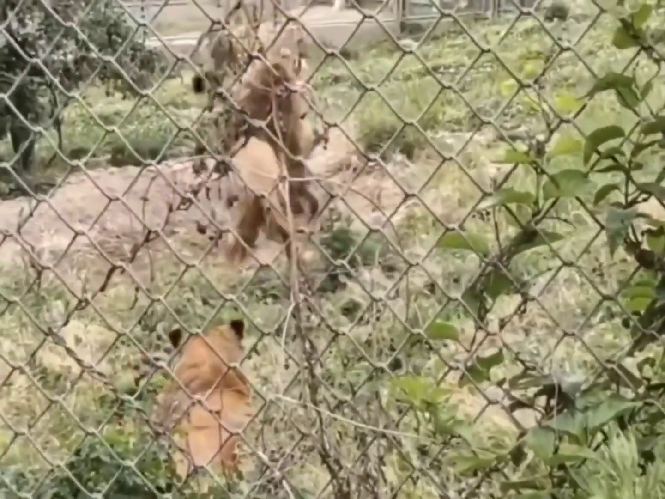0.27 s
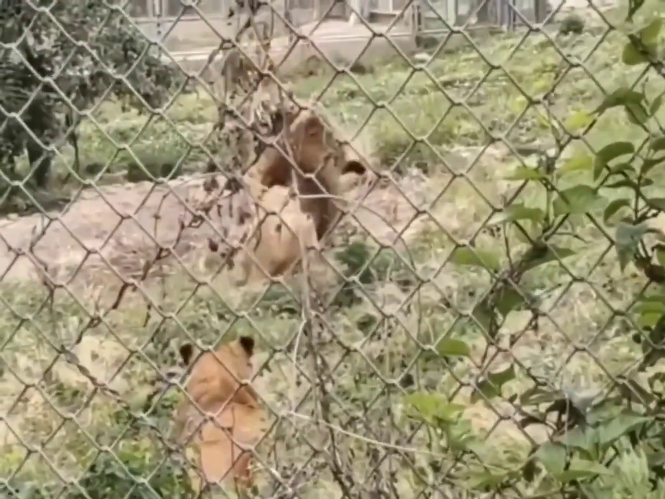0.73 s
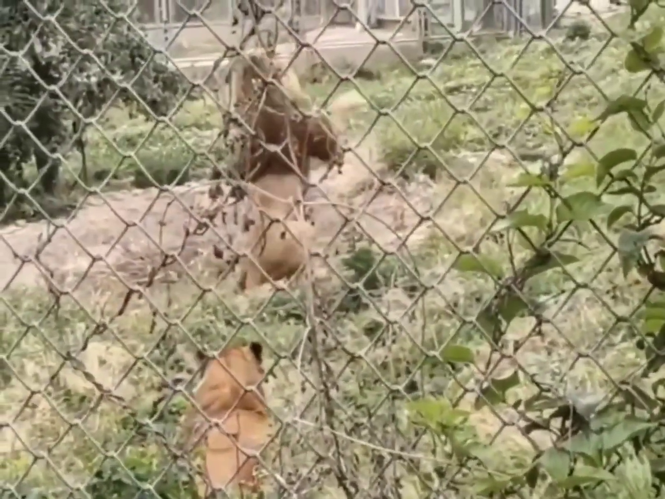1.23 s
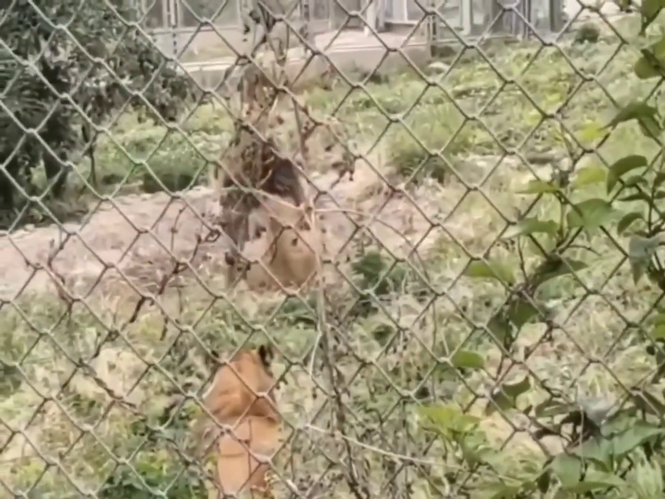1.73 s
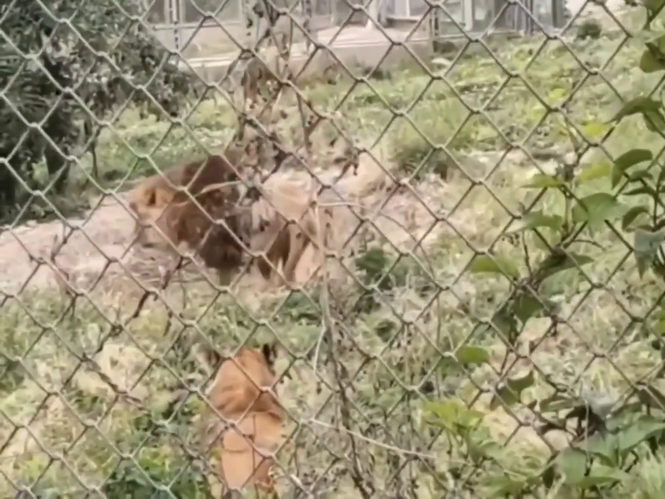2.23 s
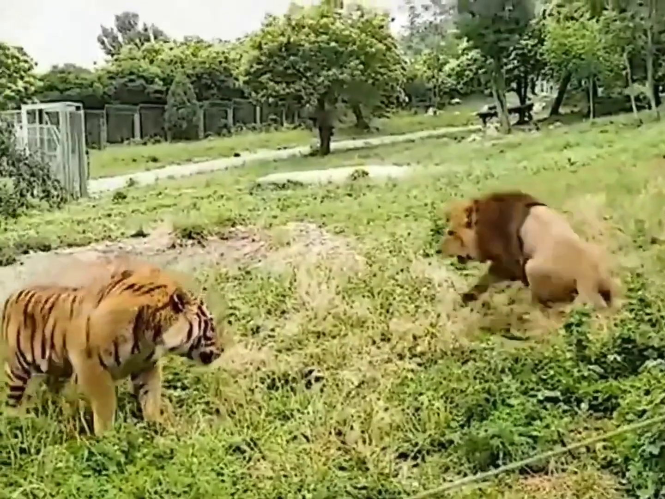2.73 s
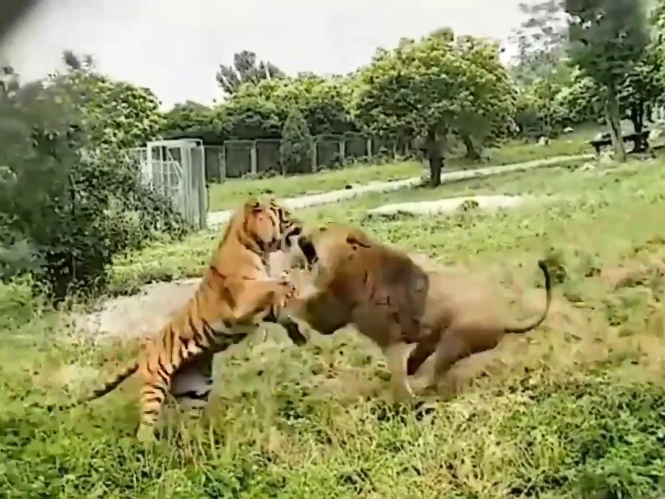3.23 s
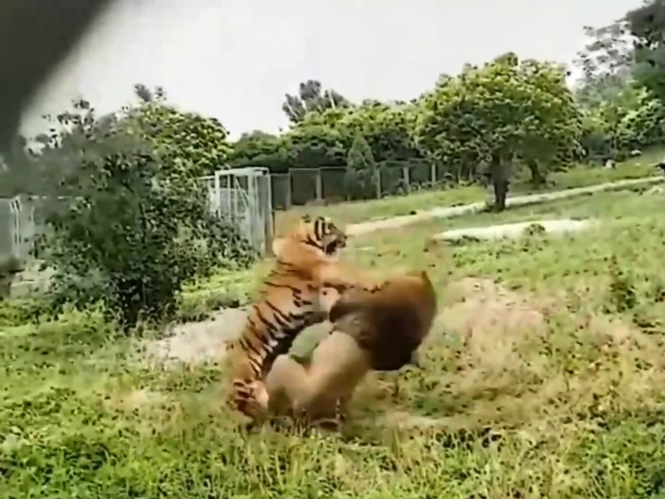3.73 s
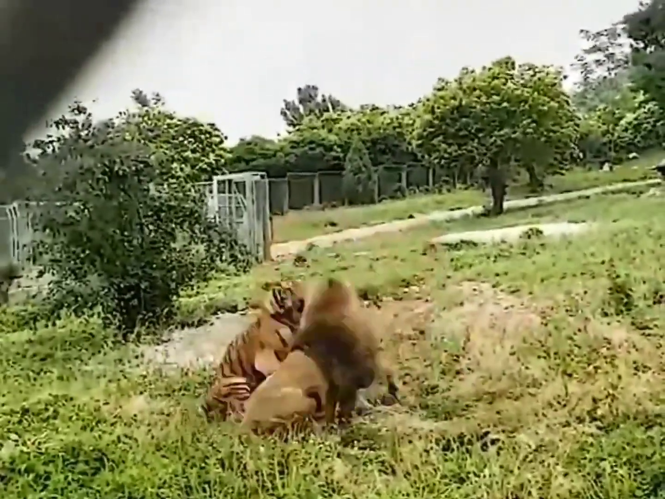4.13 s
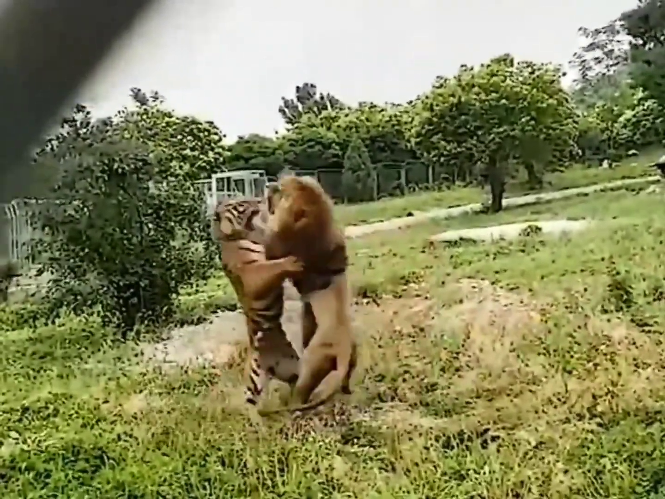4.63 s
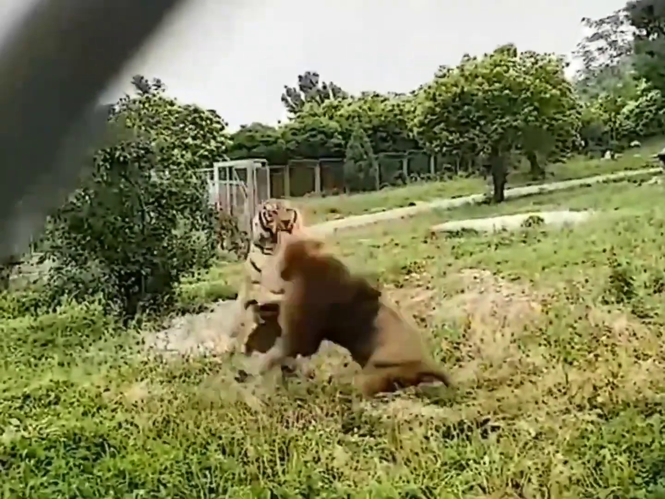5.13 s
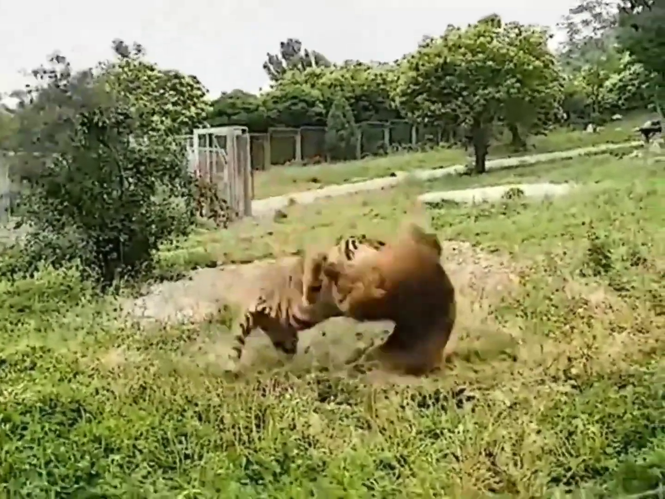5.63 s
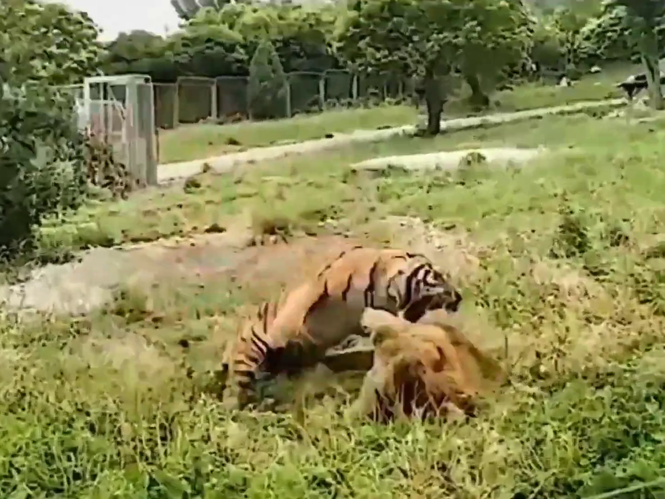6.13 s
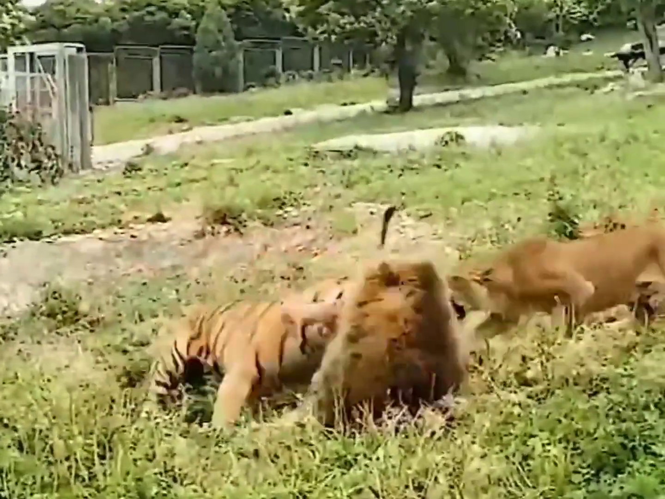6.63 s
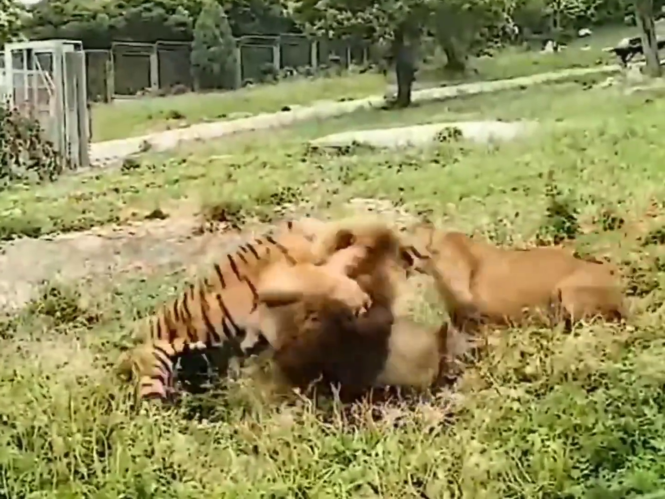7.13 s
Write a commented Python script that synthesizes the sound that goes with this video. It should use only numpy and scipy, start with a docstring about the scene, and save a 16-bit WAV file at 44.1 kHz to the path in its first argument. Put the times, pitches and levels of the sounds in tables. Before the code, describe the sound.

Big cats fight in the open air: rattling low growls swell into hoarse, raspy roars and snarls, with heavy bodies thudding on the ground.

```python
"""A grassy enclosure where lions and a tiger fight: rattling growls break into hoarse roars and snarls.
Slack vocal folds flap unevenly and ring chest, throat and mouth; some roars lock into a pitch.
The puffs of air between the flaps rasp and sizzle at the teeth, and slow single flaps stand out as rattles.
Bodies thud on the ground, dry stalks snap, paws crunch into brush and a short thin squeal slips out.
Coloured noise is the open air behind it all; the whole level dips briefly twice."""
import sys
import numpy as np
from scipy import signal
from scipy.fft import rfft, irfft
from scipy.io import wavfile
from scipy.ndimage import uniform_filter1d

SR = 44100
rng = np.random.default_rng(int(sys.argv[2]) if len(sys.argv) > 2 else 0)


def bounce(signal):
    """Save signal as a 16-bit WAV file at the path given by the first command-line argument."""
    frames = np.transpose(np.atleast_2d(signal))
    limited = np.clip(frames, -1, 1)
    pcm = np.round(limited * 32767).astype(np.int16)
    wavfile.write(sys.argv[1], SR, pcm)


N = 325017
T = np.arange(N) / SR


def amp(db):
    """Turns decibels into an amplitude factor."""
    return 10 ** (np.asarray(db) / 20)


def curves(rows):
    """Draws each column of a timed table as a curve over all samples."""
    s, *columns = np.transpose(rows)
    return [np.interp(T, s, c) for c in columns]


def steady(x, size=2200):
    """Levels out a sound so that its short-term power stays near one."""
    power = uniform_filter1d(uniform_filter1d(x ** 2, size), size // 2)
    return x / np.sqrt(abs(power) + 1e-14)


def wander(hz):
    """Slow random drift of unit size that fades out above the given rate."""
    freqs = np.fft.rfftfreq(N, 1 / SR)
    x = irfft(rfft(rng.standard_normal(N)) / (1 + (freqs / hz) ** 4), N)
    return x / x.std()


def colour(x, points):
    """Shapes a sound by a spectrum of (f/Hz, level/dB) points; unit power."""
    hz, db = np.transpose(points)
    log_freqs = np.log(np.fft.rfftfreq(N, 1 / SR) + 1)
    y = irfft(rfft(x) * amp(np.interp(log_freqs, np.log(hz), db)), N)
    return y / y.std()


def resonate(x, hz, pole_width):
    """A steep resonance, three equal poles deep, that follows the curve hz; near unit power."""
    turn = np.exp(2j * np.pi * np.cumsum(hz * np.ones(N)) / SR)
    r = np.exp(-np.pi * pole_width / SR)
    # shift the resonance down to 0 Hz, smooth there, shift back up
    y = (turn * signal.lfilter([(1 - r) ** 3], np.poly([r, r, r]), x / turn)).real
    return steady(y)


def add(mix, s, sound):
    """Lays a sound into the mix at s seconds."""
    part = mix[max(round(s * SR), 0):][:len(sound)]
    part += sound[:len(part)]


def echoes(x, wet_db, t60):
    """Scattered echoes: random taps of either sign after 3 ms, dying by 60 dB in t60 seconds."""
    t = np.arange(SR // 2) / SR
    signs = rng.choice([-1., 1.], len(t))
    hits = rng.random(len(t)) < 2500 / SR  # 2500 echoes per s on average
    taps = signs * hits * (t > .003) * amp(-60 * t / t60)
    wet = amp(wet_db) * signal.fftconvolve(x, taps / np.linalg.norm(taps))[:N]
    return (x + wet) / np.hypot(1, amp(wet_db))


def open_air():
    """The bed of the place: steady noise, heaviest in the bass."""
    # spectrum of the open air: f/Hz, level/dB
    air_spectrum = [(20, -49), (50, 12), (100, 23), (250, 14.5), (900, 3), (2000, -13.5), (4000, -18.5),
                    (6000, -32), (15000, -30)]
    return amp(-46.5) * colour(rng.standard_normal(N), air_spectrum)


def impacts(rows, spectrum, t60, gain_db):
    """Short bursts of coloured noise with a fast onset and an exponential decay."""
    envelope, t = np.zeros(N), np.arange(6000) / SR
    for s, level_db in rows:
        onset = 1 - np.exp(-40 * t / t60)
        add(envelope, s, amp(level_db + gain_db - 60 * t / t60) * onset)
    return envelope * colour(rng.standard_normal(N), spectrum)


def body_thuds():
    """Bodies hit the ground: noise bursts weighted to the low end."""
    # blows, before the gain: t/s, level/dB
    blows = [(2.212, -30.5), (2.292, -26), (2.315, -27), (3.722, -31), (3.997, -30.5), (5.666, -39)]
    spectrum = [(20, -46), (70, 8), (170, 19.0), (450, 2), (1500, -12.5), (4000, -28), (8000, -64)]
    return impacts(blows, spectrum, t60=0.072, gain_db=6.5)


def stalk_snaps():
    """Dry stalks snap: very short bright noise bursts."""
    # snaps, before the gain: t/s, level/dB
    breaks = [(0.195, -52), (4.9222, -41), (5.907, -47), (7.2405, -44.5), (7.3297, -43)]
    spectrum = [(800, -25), (3000, 6), (9500, 4.0), (15000, 9.0)]
    return impacts(breaks, spectrum, t60=0.013, gain_db=13.5)


def brush_crunches():
    """Paws crunch into dry brush: short noise bursts strongest around 900 Hz."""
    # steps, before the gain: t/s, level/dB
    steps = [(7.312, -39), (7.341, -36), (7.355, -35.5)]
    spectrum = [(100, -22), (900, 13.5), (2000, 2.5), (4200, 0.5), (7000, -13.0), (10000, -3.0),
                (15000, -26)]
    return impacts(steps, spectrum, t60=0.028, gain_db=9)


def squeal():
    """Air squeezed through a tight gap: narrow resonances swell and fade while their pitch falls."""
    # resonances of the gap: f/Hz, pole width/Hz, level/dB
    gap_modes = [(2570, 614, -44.5), (6110, 1230, -51)]
    start_s, length_s, fall_share = 7.248, 0.054, 0.18
    progress = np.clip((T - start_s) / length_s, 0, 1)
    air = rng.standard_normal(N)
    fall = 1 - fall_share * (progress - .5)
    tone = sum(amp(db) * resonate(air, hz * fall, width) for hz, width, db in gap_modes)
    return np.sin(np.pi * progress) * tone


def rattle_flaps():
    """Spells out each rattling run as nearly even slow flaps: (t/s, level/dB)."""
    # runs of flaps: first flap/s, last flap/s, level/dB
    runs = [(0.109, 0.33, -25.5), (0.384, 0.564, -25), (1.557, 1.673, -39), (1.971, 2.053, -44.5),
            (2.566, 2.64, -27)]
    flaps_per_s, jitter_s, uneven_db = 39, 0.00034, 1.2
    flaps = []
    for first, last, level_db in runs:
        times = np.linspace(first, last, round((last - first) * flaps_per_s) + 1)
        late, strong = rng.standard_normal((len(times), 2)).T
        flaps += zip(times + jitter_s * late, level_db + uneven_db * strong)
    return flaps


def single_flaps(rows, modes, scatter, rebound, grit, gain_db=8, rise_s=.001):
    """Each slow flap (s, dB, dB per octave, tuning ratio) rings the tract, rough with grit, and rebounds once."""
    out, t = np.zeros(N), np.arange(4000) / SR
    hz, db, t60 = np.transpose(modes)[:, :, None]
    for s, level_db, tilt_db, tuning in rows:
        detune, colour_db = rng.standard_normal((2, *hz.shape))
        mode_db = db + tilt_db * np.log2(hz / hz[0]) + 2 * colour_db
        swing = np.sin(2 * np.pi * hz * tuning * (1 + scatter * detune) * t)
        rings = amp(mode_db - 60 * t / t60) * swing
        flutter = signal.lfilter([.03], np.poly([.94, .94]), rng.standard_normal(rings.shape))
        flap = (rings * (1 + grit * flutter)).sum(0) * (1 - np.exp(-(t / rise_s) ** 2))
        rebound_s = rng.uniform(.002, .006)
        flap = flap + rebound * np.interp(t - rebound_s, t, flap)
        add(out, s, amp(level_db + gain_db) * flap / abs(flap).max())
    return out


def growl_flaps(flaps):
    """Slow flaps of a growl ring the tract with the mouth half open."""
    # modes of the half-open tract: f/Hz, level/dB, t60/s
    half_open_modes = [(247, -0.5, 0.03), (336, -5, 0.062), (485, 5.5, 0.05), (701, -2.5, 0.052),
                       (840, -9, 0.026)]
    rows = [(s, db, 0, 1) for s, db in flaps]
    return single_flaps(rows, half_open_modes, scatter=.045, rebound=.2, grit=.08)


def snarl_flaps(flaps):
    """Slow flaps with bared teeth: brighter, grittier, and tuned flap by flap."""
    # modes of the tract with bared teeth: f/Hz, level/dB, t60/s
    bared_modes = [(273, 3.5, 0.03), (516, 4, 0.047), (916, 4.5, 0.047), (1633, -5, 0.018),
                   (1867, -2.5, 0.019), (2423, -9, 0.021)]
    listed_mouth_hz = 910  # mouth resonance at which the modes lie as listed
    rows = [(s, db, tilt_db, hz / listed_mouth_hz) for s, db, tilt_db, hz in flaps]
    return single_flaps(rows, bared_modes, scatter=.025, rebound=.55, grit=.3)


def flap_pause(flaps, length_s=0.0225, depth_db=-9):
    """The folds rest around each slow flap: a short dip of the voice."""
    near = np.zeros(N)
    for s, *_ in flaps:
        near[abs(T - s) < length_s / 2] = 1
    return amp(depth_db * uniform_filter1d(near, 200))


def folds(rate_hz, jitter, uneven_db, puff_length):
    """Uneven flaps of the folds, and the decaying puff of air that each lets through."""
    turns = np.cumsum(rate_hz * np.exp(jitter * wander(69.58))) / SR
    cycle = turns.astype(int)
    strength = amp(uneven_db * np.clip(rng.standard_normal(N), -2, 2))[cycle]
    flaps = np.diff(cycle, prepend=0) * strength
    puffs = strength * np.exp(-(turns % 1) / puff_length)
    return flaps, puffs


def locked_roar(rows, flutter=0.026, shimmer=0.3, blend_s=0.029):
    """Folds swinging regularly: wavering tone, buzz of overtones, clean share, and pull on the throat's pitch."""
    hz, clean = curves(rows)
    pull = np.clip(np.minimum(T - rows[0][0], rows[-1][0] - T) / blend_s + 1, 0, 1)
    clean = np.clip(clean, 0, .97) * pull
    turns = np.cumsum(hz * (1 + flutter * wander(59.2))) / SR
    tone = np.sqrt(2 * clean) * np.cos(2 * np.pi * turns) * (1 + shimmer * wander(47))
    buzz = np.sqrt(clean * SR / hz) * np.diff(turns.astype(int), prepend=0)
    return tone, buzz, clean, pull, pull * hz


def cries():
    """Each cry rises, changes slowly and is released; gives four levels in dB and the mouth's shape over time."""
    # bursts of growl or roar: start/s, length/s, rise/s, change over the length/dB,
    # chest/dB, throat/dB, mouth/dB, rasp at the teeth/dB (all before later trims),
    # jaw f/Hz, lip f/Hz, lip level/dB, bright overtone level/dB, glide of the mouth/octaves
    bursts = [(0.022, 0.68, 0.055, -9, -36.5, -31.5, -27, -52, 490, 708, -1, -15.5, -0.12),
              (0.598, 0.14, 0.093, 1, -52, -28.5, -28.5, -40.5, 505, 635, 14, -4, 0.081),
              (0.678, 0.35, 0.12, -4.5, -48.5, -22, -19, -30.5, 561, 703, 2.5, -7, 0.034),
              (1.001, 0.47, 0.085, -8, -42, -21.5, -23.5, -41, 507, 739, 1.5, -10.5, 0.086),
              (1.429, 0.36, 0.024, -5, -37, -41.5, -36.5, -59.5, 432.5, 750, -22, -7.5, -0.095),
              (1.867, 0.15, 0.14, 0, -44.5, -36, -44.5, -71, 421, 653, -22, -18, -0.036),
              (2.188, 0.21, 0.022, 3, -42.5, -46, -48.5, -60, 450.5, 837.6, -5.5, -9, 0.17),
              (2.44, 0.18, 0.091, -4, -35.5, -36, -30, -46.5, 483.7, 843.4, -5.5, -10.5, 0.15),
              (2.721, 0.19, 0.036, -5, -42, -45.5, -42, -54.5, 467.4, 827, -7.5, -12.5, -0.062),
              (3.093, 0.14, 0.1, 4, -53, -29.5, -35, -45, 566, 895, -1, -6.5, -.12),
              (3.227, 0.27, 0.047, -0.5, -46.5, -19, -28, -41.5, 535.5, 806.5, 1, -6, -0.15),
              (3.499, 0.29, 0.045, -5, -43, -25, -30, -43, 526, 776, 1, -6, 0.13),
              (3.889, 0.3, 0.08, -4, -44, -52.5, -50.5, -56, 486, 880, -5.5, -4.5, 0.013),
              (4.15, 0.2, 0.12, -4, -40.5, -37.5, -33.5, -53, 520, 916.6, -8, -15, 0.092),
              (4.552, 0.15, 0.064, -1, -50, -43.5, -34, -54, 530.5, 923, -12, -11.5, 0.15),
              (4.659, 0.22, 0.13, 0, -56, -31, -34.5, -48, 534.3, 800.3, -4, -10.5, -0.14),
              (4.883, 0.44, 0.05, -5, -43, -32, -29.5, -47, 525, 822.3, -4.5, -11, -0.088),
              (5.388, 0.13, 0.12, -1, -37.5, -47.5, -37, -48.5, 515.2, 917, -3, -19, -0.023),
              (5.601, 0.36, 0.088, -4, -45.5, -44.5, -42, -48.5, 500, 942.7, -7.5, -13.5, 0.08),
              (5.956, 0.2, 0.018, -2, -48, -45, -35.5, -51, 486.4, 950, -10, -12, 0.027),
              (6.151, 0.17, 0.051, -12, -42, -23.5, -19, -42, 516, 744.6, -12, -16, -0.025),
              (6.301, 0.21, 0.099, -7, -41.5, -21, -22, -43, 520, 740, -8.5, -17, 0.23),
              (6.5, 0.25, 0.039, -15, -34.5, -25, -33.5, -50, 504, 860, -4, -7, -0.1),
              (6.717, 0.22, 0.11, -4, -37, -33, -31.5, -45, 469.5, 879.6, -5.5, -11.5, 0.22),
              (6.994, 0.21, 0.12, 1, -41, -41, -37.5, -49, 476, 1031, -5.5, -8, 0.28),
              (7.316, 0.053, 0.029, 3.5, -42, -39.5, -39, -45, 467, 907, 7, -4, 0.046)]
    # chest, throat, mouth, rasp [dB per s]
    release = np.array([109, 190, 190, 87])[:, None]
    power, shape, weight = np.zeros((4, N)), np.zeros((6, N)), np.zeros(N)
    for start, length, rise, change_db, chest, throat, mouth, rasp, *mouth_shape in bursts:
        now = slice(*np.searchsorted(T, [start, start + length + .5]))
        t = T[now] - start
        progress = np.minimum(t / length, 1)
        levels_db = np.array([chest, throat, mouth, rasp])[:, None] + change_db * progress
        levels_db = levels_db - release * np.maximum(t - length, 0)
        swell = np.sin(np.pi / 2 * np.minimum(t / rise, 1))
        cry = (amp(levels_db) * swell) ** 2
        power[:, now] += cry
        # where cries overlap, the louder mouth decides the shape
        shape[:, now] += cry[2] * np.array(np.broadcast_arrays(progress, *mouth_shape))
        weight[now] += cry[2]
    return 10 * np.log10(power + 1e-9), shape / (weight + 1e-30)


def teeth_noise(air, rasp_db):
    """Puffing air rasps in the mouth and sizzles at the teeth, both flickering in level."""
    # rasp in the mouth: f/Hz, level/dB
    rasp_spectrum = [(900, -8.5), (1500, 9.5), (2700, 1.5), (4200, 3), (5600, -4.5), (7200, -12),
                     (16000, -44)]
    # sizzle at the teeth: f/Hz, level/dB
    sizzle_spectrum = [(4000, -22.5), (7500, -14), (8400, -5.5), (11500, -1), (14600, 1.5), (15600, -9)]
    air = echoes(air, wet_db=-9.5, t60=0.0087)  # near echoes colour the rasp
    # the sizzle grows faster with the airflow than the rasp does
    sizzle_db = -1.0 + 0.26 * (rasp_db + 35.5) + 2.1 * wander(37)
    sizzle = amp(sizzle_db) * colour(air, sizzle_spectrum)
    rasp = amp(2.56 * wander(23.0)) * colour(air, rasp_spectrum)
    return (rasp + sizzle) * amp(rasp_db - 3.0)


def voices(slow_flaps, breathy=0.93, leak=0.99, buzz_share=0.4):
    """Flaps and puffs of the folds ring the chest, throat and mouth; the same puffs rasp past the teeth."""
    # roars that lock into a pitch, one list each: t/s, pitch f/Hz, clean share/0-1
    roars = [
        [(0.98, 274.6, 0.4), (1.08, 297, 0.03), (1.25, 299.1, 0.1)],
        [(3.17, 294, 0.1), (3.24, 286.6, 0.3), (3.27, 284.4, 1), (3.36, 249, 0.73), (3.4, 253.8, 0.96),
         (3.5, 261.2, 0.86), (3.57, 250.5, 0.46), (3.68, 238, 0.4), (3.77, 255.8, 0.07)],
        [(6.17, 364.7, 0.2), (6.215, 336, 0.22), (6.3, 253.8, 0.2), (6.48, 247.2, 0.58), (6.56, 285.2, 0.29),
         (6.62, 242, 0.06)],
    ]
    # the voice follows the effort: throat level/dB, fold flap rate/Hz, throat f/Hz, coarseness/0-1
    effort_law = [(-42, 41, 230, 0.23), (-32, 90, 273, 0.35), (-23, 140, 272, 0.13)]
    # chest resonances: f/Hz, pole width/Hz, level/dB
    chest_modes = [(192, 90, 0.5), (95, 53, -0.5)]
    # narrow upper resonances of the open mouth: f/Hz, level/dB
    upper_modes = [(1780, 4.5), (2050, 6), (2500, 7.5), (3450, 6)]
    sway, upper_sway = 0.07, 0.056  # shares by which the resonances wander
    throat_sink, mouth_arch = 0.13, 0.058  # shares of f by which throat sinks and mouth opens and closes

    (chest_db, throat_db, mouth_db, rasp_db), mouth_shape = cries()
    progress, jaw_hz, lip_hz, lip_db, bright_db, glide = mouth_shape
    # a hissing snarl strains the folds like a throat 14 dB above its rasp
    effort = np.maximum(throat_db, rasp_db + 14)
    effort_db, *law = np.transpose(effort_law)
    rate_hz, throat_hz, coarse = (np.interp(effort, effort_db, column) for column in law)
    tone, buzz, clean, pull, roar_hz = np.sum([locked_roar(rows) for rows in roars], axis=0)
    throat_hz = (1 - pull) * throat_hz * (1 - throat_sink * (progress - .5)) + roar_hz
    opening = 1 + mouth_arch * (np.sin(np.pi * progress) - .85)
    opening = opening * 2 ** (glide * (progress - .5))
    jaw_hz, lip_hz = jaw_hz * opening, lip_hz * opening

    flaps, puffs = folds(rate_hz * np.exp(.2 * wander(9)), jitter=.2, uneven_db=2.2, puff_length=.55)
    air = (leak + puffs) * rng.standard_normal(N)
    drive = steady(flaps) + breathy * steady(air)
    drive = echoes(drive, wet_db=-1.0, t60=0.049)  # first echoes smear one flap into the next
    drive = np.sqrt(np.clip(1 - buzz_share * clean, 0, 1)) * drive + np.sqrt(buzz_share) * buzz
    # slack folds break the voice into separate puffs
    chop = steady(1 - coarse + coarse * steady(uniform_filter1d(puffs, size=80)))

    def formant(hz, pole_width):
        """Tongue and jaw sway each resonance on its own."""
        return resonate(drive, hz * (1 + sway * wander(11.0)), pole_width)

    chest = steady(sum(amp(db) * formant(hz, width) for hz, width, db in chest_modes))
    hoarse = steady(formant(throat_hz, 159), size=1400)
    throat = np.sqrt(np.clip(1 - clean, 0, 1)) * hoarse + tone

    mouth = formant(jaw_hz, 168) + amp(lip_db) * formant(lip_hz, 217)
    mouth = mouth + amp(bright_db) * formant(lip_hz + 334, 393)  # the bright overtone rides above the lip
    # tongue and jaw make the mouth's loudness uneven
    mouth = steady(mouth, size=1400) * amp(1.0 * wander(20))

    upper = 0
    for hz, db in upper_modes:
        swaying_hz = hz * opening * (1 + upper_sway * wander(14.4))
        upper = upper + amp(db) * resonate(drive, swaying_hz, hz / 8.6)
    # the upper resonances grow with both the mouth and the rasp
    upper = amp(-5 + 0.4 * mouth_db + 0.74 * rasp_db) * steady(upper)

    tract = amp(throat_db) * throat + chop * (amp(mouth_db) * mouth + upper)
    voice = amp(chest_db + 3.0) * chest + flap_pause(slow_flaps) * tract
    return voice + teeth_noise(air, rasp_db)


def scene():
    """The fight with its echoes from ground, slope and trees, over the open air."""
    # lone slow flaps of a growl, before the gain: t/s, level/dB
    lone_flaps = [(0.046, -26.5), (0.597, -27.5), (0.65, -24), (1.374, -24), (2.486, -33.5), (4.259, -28.5),
                  (4.615, -33.5), (4.868, -29), (4.951, -25.5), (5.111, -30), (5.137, -28), (5.704, -35),
                  (6.071, -31.5), (6.095, -30)]
    # single flaps with bared teeth, before the gain: t/s, level/dB, brightness/dB per octave, mouth f/Hz
    bared_flaps = [(4.329, -31, -2.5, 921), (5.223, -25.5, -1, 830), (5.281, -36, 0, 880),
                   (5.308, -24.5, 1.5, 882), (5.339, -38.5, 2, 911), (5.768, -28, -4.5, 933),
                   (5.795, -25, 3, 897), (5.855, -26, 7.5, 808), (5.883, -21, 3.5, 880),
                   (5.913, -37, 8, 950), (5.976, -26.5, -1.5, 814), (6.036, -30, 2.5, 914),
                   (6.939, -31.5, 0, 887)]
    slow_flaps = lone_flaps + rattle_flaps()
    air = open_air()
    ground = body_thuds() + stalk_snaps() + brush_crunches()
    slow_voice = squeal() + growl_flaps(slow_flaps) + snarl_flaps(bared_flaps)
    fight = ground + slow_voice + voices(slow_flaps + bared_flaps)
    return (echoes(fight, wet_db=-12.0, t60=0.11) + air)[None]


def record(dry):
    """A small microphone thins the deep bass; the level dips briefly twice; a low-pass limits the treble."""
    thin = signal.sosfilt(signal.butter(2, 70, "high", fs=SR, output="sos"), dry)
    dips_s = [(2.327, 2.356), (2.690, 2.709)]
    dipped = uniform_filter1d(sum(1. * (T > a) * (T < b) for a, b in dips_s), 60)
    low_pass = signal.firwin(511, 15750, window=("kaiser", 9), fs=SR)
    return signal.oaconvolve(thin * amp(-32 * dipped), low_pass[None], "same")


dry = scene()
out = record(dry)
bounce(out)
```